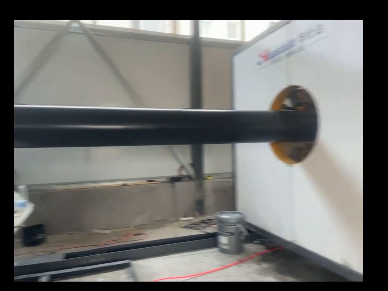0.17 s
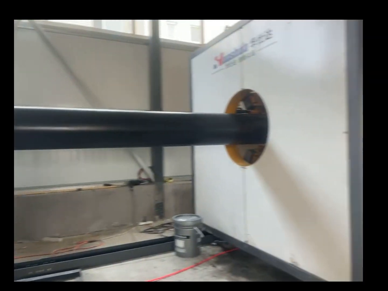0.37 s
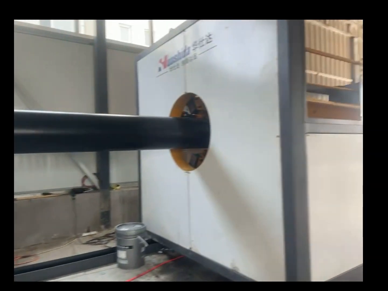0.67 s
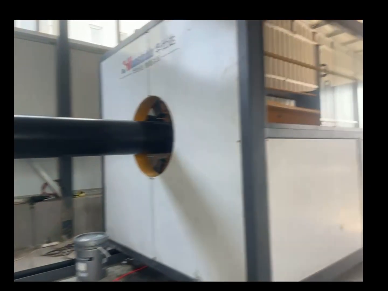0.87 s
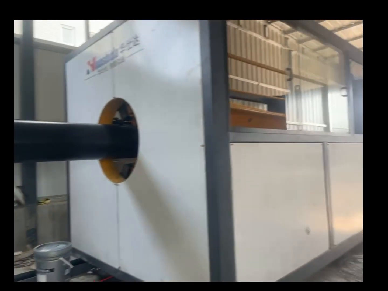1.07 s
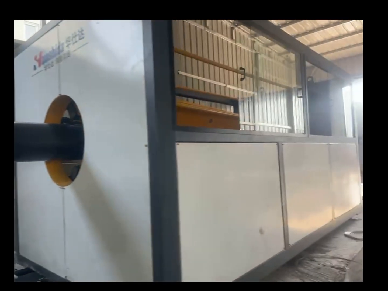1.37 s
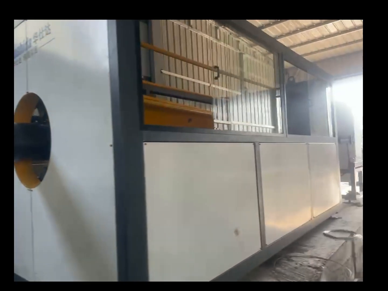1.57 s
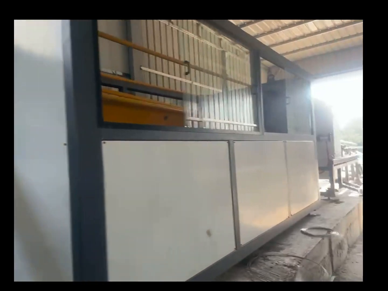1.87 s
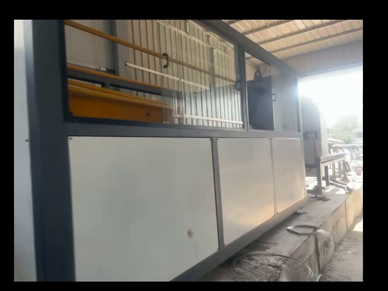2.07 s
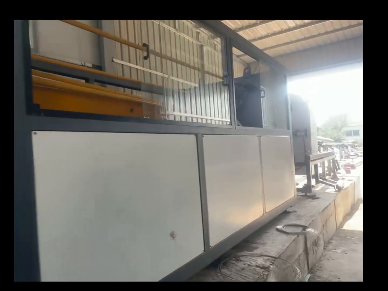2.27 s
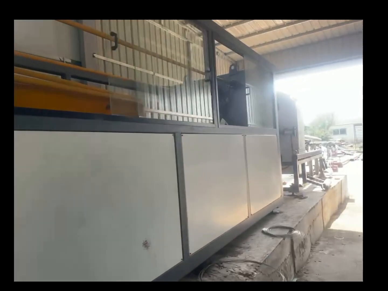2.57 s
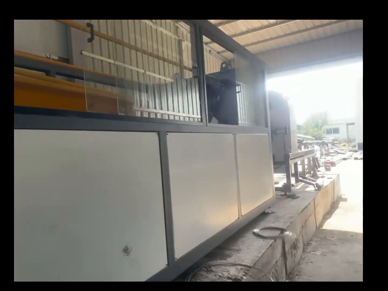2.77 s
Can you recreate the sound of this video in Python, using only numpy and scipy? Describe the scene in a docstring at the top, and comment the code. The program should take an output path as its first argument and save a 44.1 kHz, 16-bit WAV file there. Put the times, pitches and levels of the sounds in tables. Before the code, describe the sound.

Factory pumps and fans roar without a break inside a shed, joined by hissing cooling water, electrical hum and floor rumble. A high motor whine and a thin whistle waver as the microphone is carried past the machine.

```python
"""Pumps and fans roar under the ringing whine of an inverter-fed motor: a pipe extrusion line in a shed.
The whine is a cluster of beating sidebands around the switching rate. Water spray hisses in the cooling
tank, a pump whistles, motors and mains hum, the floor rumbles. As the microphone is carried along the
tank, the tones drift slightly in pitch and swell and fade in the steel shed's standing waves."""
import sys
import numpy as np
from scipy import signal
from scipy.fft import rfft, irfft, next_fast_len
from scipy.io import wavfile
from scipy.ndimage import uniform_filter1d, map_coordinates

SR = 44100
rng = np.random.default_rng(int(sys.argv[2]) if len(sys.argv) > 2 else 0)


def persist_wave(psi):
    """Save psi, clipped to +-1, as 16-bit WAV."""
    counts = np.round(np.clip(psi, -1, 1) * 32767).astype(np.int16)
    wavfile.write(sys.argv[1], SR, np.atleast_2d(counts).T)


N = 128331

# noise spectra: f/Hz, relative density/dB
ROAR_SPECTRUM = [(70, -28), (130, -11), (185, -0.5), (260, 2), (340, -2.5), (480, -5.5), (580, -3),
                 (640, 1.5), (710, -4.5), (800, -10.5), (885, -2.5), (970, -5.5), (1500, -7.5),
                 (2400, -12.5), (5000, -38)]
SPRAY_SPECTRUM = [(600, -30), (1700, -1.5), (3050, 2.5), (3350, -0.5), (4100, 0), (5400, -4), (6300, -7.5),
                  (8400, -9), (10300, -13.5), (12300, -14), (13200, -33)]
RUMBLE_SPECTRUM = [(25, -31), (38, -24), (50, -7), (72, -5), (90, 1), (142, 5), (200, -12), (400, -45)]
# contours of roar, weak sidebands and rumble, swing scaled in use: t/s, relative level/dB
ROAR_CONTOUR = [(0.0, -34), (1.0, -35.5), (1.2, -33.5), (1.4, -34.5), (2.9, -36)]
CLUSTER_CONTOUR = [(0.0, -35.5), (0.6, -34), (0.88, -39), (1.0, -32.5), (1.5, -33), (1.78, -33.5),
                   (2.4, -32), (2.8, -34.5)]
RUMBLE_CONTOUR = [(0.0, -34), (0.37, -34.5), (0.52, -30), (0.58, -39), (0.8, -32.5), (0.86, -34),
                  (1.35, -33.5), (1.75, -34), (1.92, -32.5), (2.0, -36.5), (2.9, -33.5)]
# strong sidebands below, just above and above the switching rate: t/s, relative level/dB
LOWER_SIDEBAND_LEVEL = [(0.0, -48.0), (0.17, -31.5), (0.28, -41), (0.54, -48), (0.6, -30.5), (0.69, -33),
                        (0.75, -45), (0.79, -36.0), (0.92, -39), (0.98, -44), (1.04, -32), (1.12, -32.5),
                        (1.2, -45.0), (1.25, -35), (1.65, -35.5), (1.74, -46), (1.79, -38), (1.98, -31),
                        (2.06, -44), (2.14, -31.5), (2.23, -44.5), (2.27, -38), (2.43, -30.5), (2.5, -47.0),
                        (2.54, -30.5), (2.75, -38.5), (2.79, -53), (2.9, -33)]
INNER_SIDEBAND_LEVEL = [(0.0, -42), (1.05, -42), (1.13, -46), (1.38, -37), (1.57, -36), (1.69, -60),
                        (2.29, -31), (2.46, -47), (2.9, -48)]
UPPER_SIDEBAND_LEVEL = [(0.0, -32.5), (0.14, -31.5), (0.19, -43), (0.34, -27), (0.49, -34.5), (0.59, -28.5),
                        (0.66, -37.0), (0.76, -33), (0.91, -45.0), (0.98, -32.5), (1.1, -42.0), (1.21, -35),
                        (1.26, -40), (1.35, -35), (1.73, -41.5), (1.86, -33), (1.95, -47), (2.12, -28.5),
                        (2.22, -33), (2.34, -47.5), (2.39, -36), (2.61, -34), (2.66, -55), (2.72, -34),
                        (2.9, -45)]
# weak sidebands of the switching rate and its octave: offset/feed steps, level/dB
WEAK_SIDEBANDS = [(-15, -51), (-9, -45), (-5, -41.5), (-1, -42.5), (5, -40.5), (7, -46.5), (9, -44),
                  (11, -49.5), (13, -51), (15, -52), (17, -52), (23, -49)]
OCTAVE_SIDEBANDS = [(-2, -54), (0, -51.5), (2, -55)]
# water hiss, pump undertone: t/s, level/dB
SPRAY_LEVEL = [(0.0, -32.5), (0.55, -33.5)]
UNDERTONE_LEVEL = [(0.0, -49), (0.69, -40.5), (0.82, -52), (0.93, -37.5), (1.6, -55), (1.83, -56),
                   (2.1, -41), (2.55, -50), (2.66, -38), (2.9, -44)]
# pump whistle, fan blade tone: t/s, relative level/dB
WHISTLE_LEVEL = [(0.0, -34), (0.05, -28.0), (0.11, -40), (0.16, -34.5), (0.21, -48), (0.29, -28),
                 (0.35, -39.0), (0.47, -34.5), (0.51, -39.5), (0.65, -43), (0.68, -34), (0.73, -33.5),
                 (0.78, -44), (0.83, -30.5), (0.92, -43.5), (0.98, -30.5), (1.05, -37), (1.08, -30),
                 (1.14, -27.5), (1.21, -45), (1.23, -37), (1.3, -36.0), (1.37, -31), (1.43, -42.5),
                 (1.69, -29.5), (1.75, -50), (1.87, -29.5), (2.02, -49), (2.05, -39.0), (2.23, -28.5),
                 (2.29, -39.5), (2.33, -32), (2.45, -44.5), (2.61, -36.5), (2.81, -33.5), (2.9, -43)]
BLADE_LEVEL = [(0.0, -46), (1.09, -47), (1.19, -34.5), (1.41, -46), (1.64, -31.5), (1.9, -39.5),
               (2.0, -39.5), (2.7, -45.5), (2.9, -36)]
# pump whistle: t/s, f/Hz
WHISTLE_PITCH = [(0.0, 1373), (2.15, 1372), (2.5, 1374.5)]
# motor and mains lines: f/Hz, level/dB
HUM_LINES = [(99.6, -43), (121.8, -44), (142, -47), (196, -45.5), (297, -46), (403, -52.5), (602, -54.5),
             (624.5, -47), (703, -47.5), (883, -52), (1176, -56.5), (1396, -49.5)]

FADE_KNOTS_PER_S, DRIFT_KNOTS_PER_S = 10.084, 4
DRIFT_RMS_CYCLES_PER_KHZ = 0.08
FAINT_ECHO = 0.096  # reflected/direct amplitude


def roar(base_db=-30.5):
    """Broad noise of pumps and fans, coloured by tank and shed."""
    return amp(base_db + 0.72 * swing_db(ROAR_CONTOUR)) * rush(ROAR_SPECTRUM, patchy_db=0.65)


def drive_motor(switch_hz=2000, feed_hz=17.93, strong_gain_db=0.47):
    """Inverter sidebands, whole feed steps from the switching rate and its octave, beat into a whine."""
    strong_bands = [(-3, LOWER_SIDEBAND_LEVEL), (1, INNER_SIDEBAND_LEVEL), (3, UPPER_SIDEBAND_LEVEL)]
    strong = sum(amp(strong_gain_db + curve(level)) * tone(switch_hz + steps * feed_hz, FAINT_ECHO)
                 for steps, level in strong_bands)
    clusters = [(switch_hz, WEAK_SIDEBANDS), (2 * switch_hz, OCTAVE_SIDEBANDS)]
    weak = sum(amp(db) * tone(centre_hz + steps * feed_hz, echo=1.34)
               for centre_hz, bands in clusters for steps, db in bands)
    weak_gain = unit(amp(0.8 * curve(CLUSTER_CONTOUR)))
    return strong + weak_gain * weak


def water_spray():
    """Even hiss of cooling water in the tank."""
    return amp(curve(SPRAY_LEVEL)) * rush(SPRAY_SPECTRUM, patchy_db=0.54)


def pump_whistle(waver_hz=1.6, mains_hz=50, whistle_gain_db=0.53):
    """Wavering whistle and an undertone twice the mains frequency below; each fades on its own."""
    pitch_hz = curve(WHISTLE_PITCH) + waver_hz * wobble(FADE_KNOTS_PER_S)
    whistle = amp(whistle_gain_db + curve(WHISTLE_LEVEL)) * tone(pitch_hz, FAINT_ECHO)
    undertone = amp(curve(UNDERTONE_LEVEL)) * tone(pitch_hz - 2 * mains_hz, echo=0.46)
    return whistle + undertone


def hum(blade_hz=365.3, blade_gain_db=1.6):
    """Motor and mains lines plus a fan's blade tone."""
    lines = sum(amp(db) * tone(hz, echo=0.67) for hz, db in HUM_LINES)
    blade = amp(blade_gain_db + curve(BLADE_LEVEL)) * tone(blade_hz, echo=0.43)
    return lines + blade


def rumble(base_db=-38.5):
    """Uneven pump rumble through the floor."""
    return amp(base_db + 1.9 * swing_db(RUMBLE_CONTOUR)) * rush(RUMBLE_SPECTRUM, patchy_db=0.5)


def tone(hz, echo):
    """Tone at the moving microphone, rms 1: Doppler drift, plus reflections varying in size and phase."""
    reflections = unit(wobble(FADE_KNOTS_PER_S) + 1j * wobble(FADE_KNOTS_PER_S))
    doppler_cycles = DRIFT_RMS_CYCLES_PER_KHZ * hz / 1000 * wobble(DRIFT_KNOTS_PER_S)
    phase_cycles = np.cumsum(hz * np.ones(N)) / SR + doppler_cycles + rng.random()
    direct = np.exp(2j * np.pi * phase_cycles)
    return unit(np.real((1 + echo * reflections) * direct))


def rush(spectrum, patchy_db):
    """Coloured noise, rms 1, with random gain patches in time and frequency."""
    cells = signal.stft(rng.standard_normal(N), nperseg=512)[2]
    patches = uniform_filter1d(rng.standard_normal(cells.shape), size=6, axis=0)
    patches = uniform_filter1d(patches, size=14, axis=1)
    noise = signal.istft(cells * amp(patchy_db * unit(patches)), nperseg=512)[1][:N]
    knots_hz, knots_db = np.transpose(spectrum)
    return unit(filtered(noise, lambda hz: amp(np.interp(np.log(hz + 1), np.log(knots_hz + 1), knots_db))))


def filtered(x, response):
    """x filtered by the gain response(f/Hz)."""
    size = next_fast_len(N + SR // 2)
    return irfft(rfft(x, size) * response(np.fft.rfftfreq(size, 1 / SR)), size)[:N]


def wobble(knots_per_s):
    """Smooth random curve, rms 1."""
    position = np.arange(N) * knots_per_s / SR + 2
    return unit(map_coordinates(rng.standard_normal(256), [position], mode="wrap"))


def curve(rows):
    """Rows of t/s, value to one value per sample."""
    return np.interp(np.arange(N) / SR, *np.transpose(rows))


def swing_db(contour):
    """Level about its mean, per sample."""
    level_db = curve(contour)
    return level_db - level_db.mean()


def amp(db):
    """dB to gain."""
    return 10 ** (np.asarray(db) / 20)


def unit(x):
    """Scale to rms 1."""
    return x / np.sqrt(np.mean(np.abs(x) ** 2) + 1e-20)


def scene():
    """All sources at one microphone, same in both channels."""
    mono = rumble() + roar() + water_spray() + hum() + pump_whistle() + drive_motor()
    return np.array([mono, mono])


def record(dry):
    """Brick-wall low-pass."""
    cutoff_hz = 14100
    return np.array([filtered(channel, lambda hz: hz < cutoff_hz) for channel in dry])


dry = scene()
out = record(dry)
persist_wave(out)
```